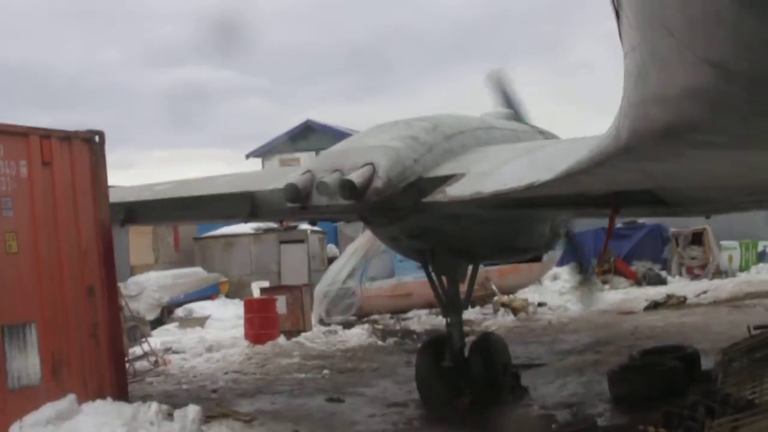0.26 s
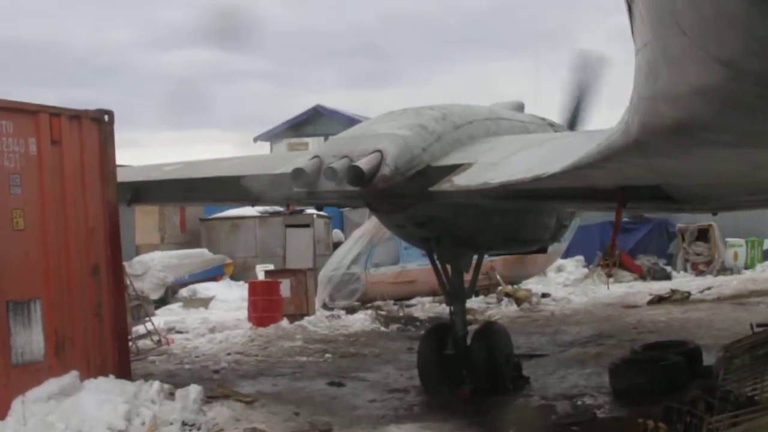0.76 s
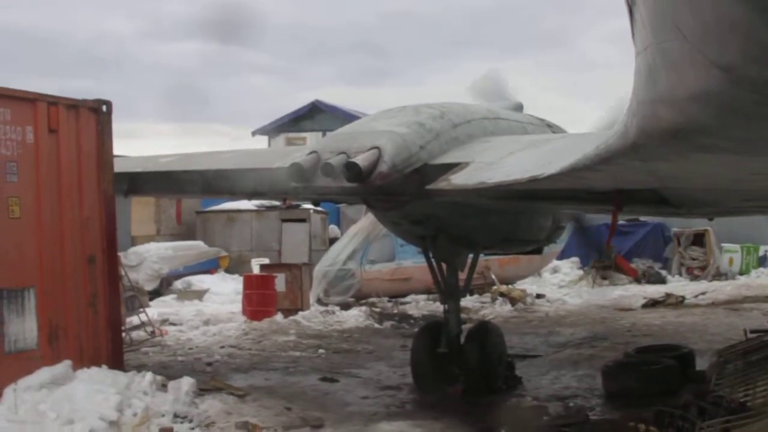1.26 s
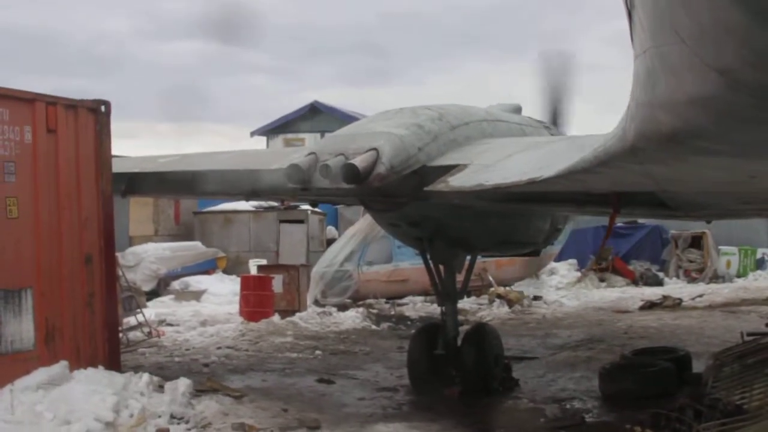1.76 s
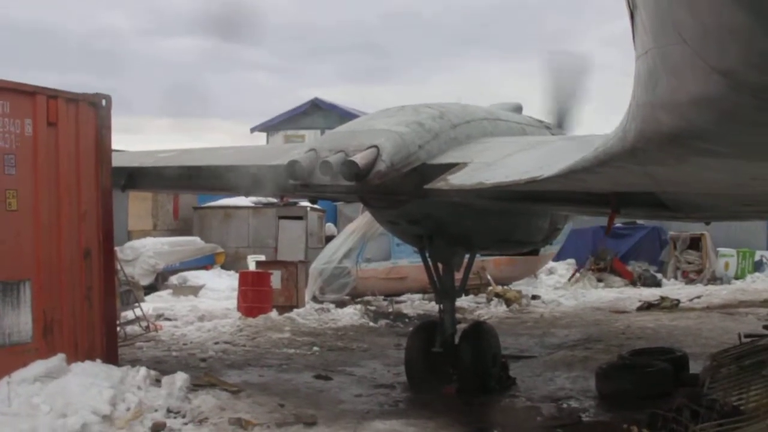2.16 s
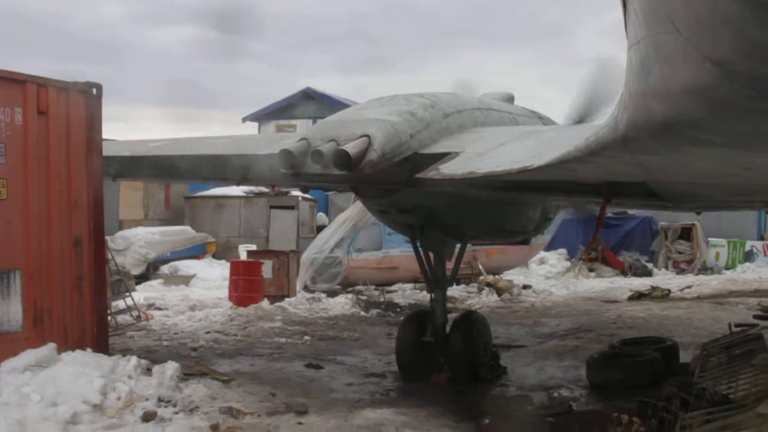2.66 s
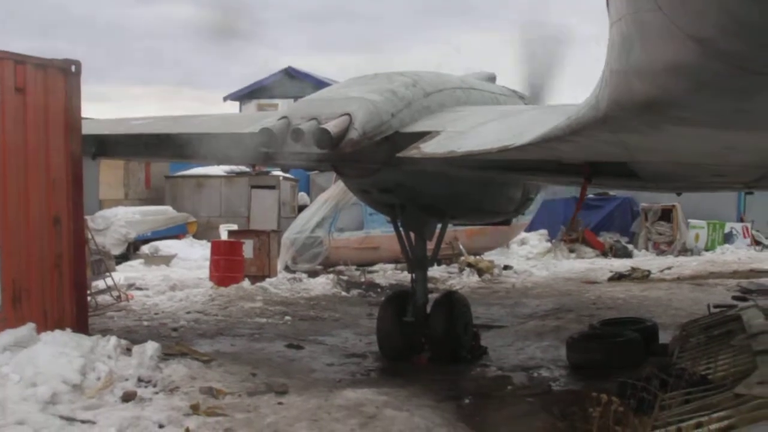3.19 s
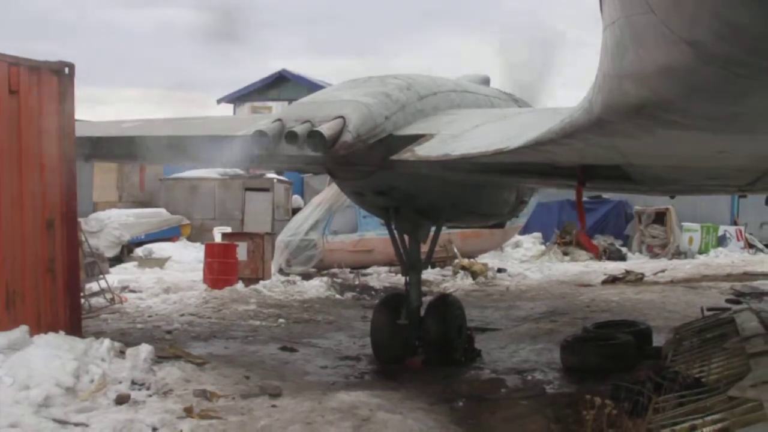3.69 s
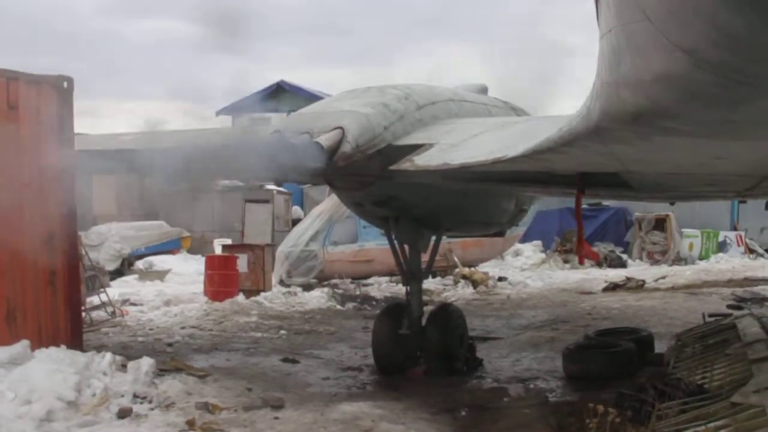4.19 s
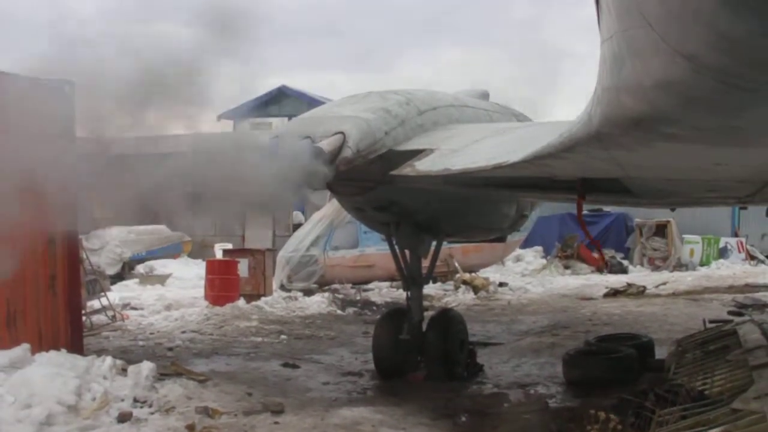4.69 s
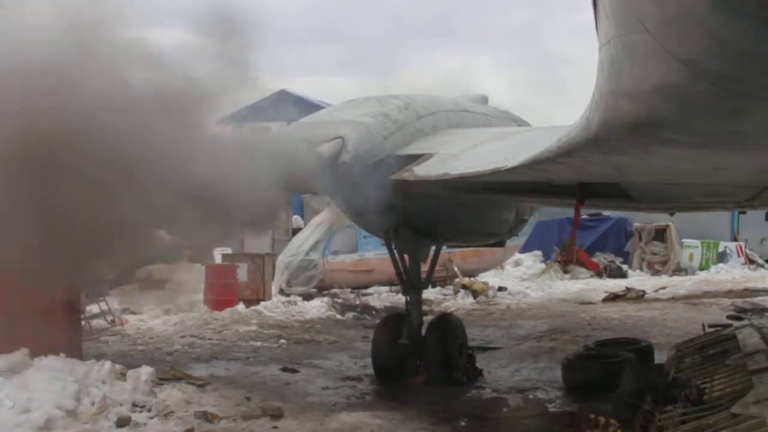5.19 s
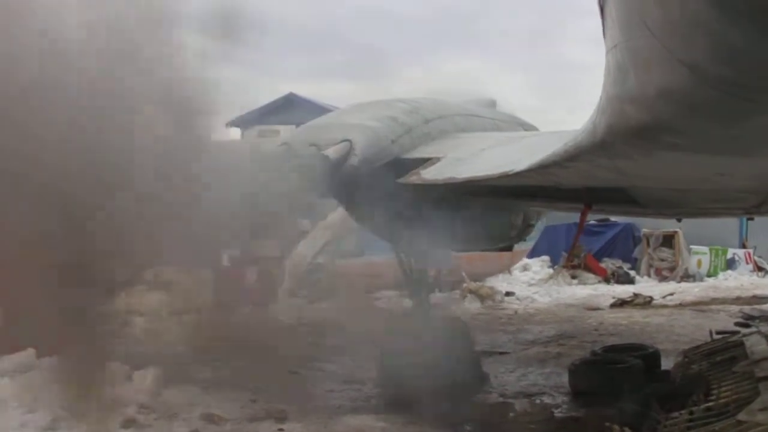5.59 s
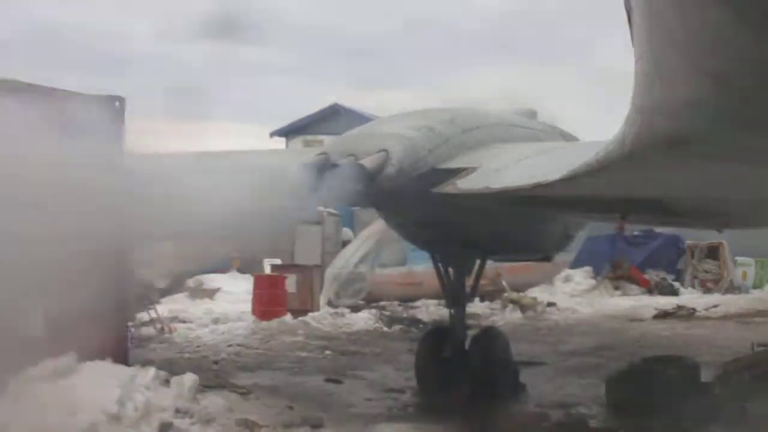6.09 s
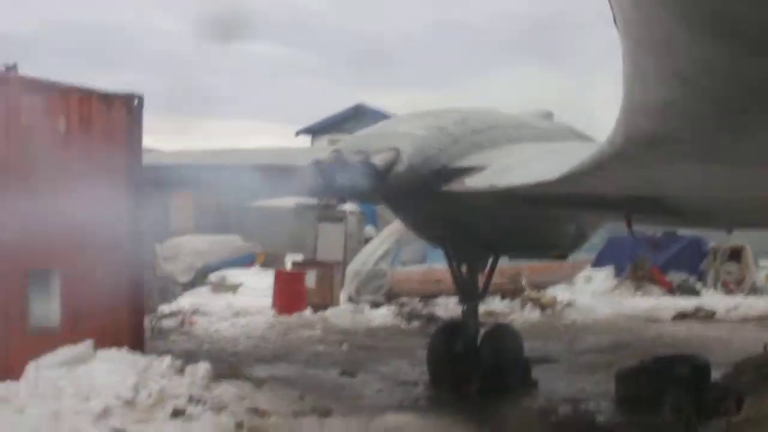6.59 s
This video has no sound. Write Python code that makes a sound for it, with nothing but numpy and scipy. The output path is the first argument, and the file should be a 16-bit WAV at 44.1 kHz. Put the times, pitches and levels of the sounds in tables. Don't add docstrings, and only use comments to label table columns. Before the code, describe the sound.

Close to a parked propeller aircraft in a yard, the starter cranks a large piston engine. Separate hollow exhaust coughs puff out over dull pumping, faint valve hiss and a thin gear whine. After about three seconds the cylinders catch in ragged rapid blasts, build into a rough droning roar with standout pops, and finally propeller wash thuds and crackles on the overloaded microphone.

```python
import sys
import numpy as np
from scipy import signal
from scipy.fft import rfft, irfft
from scipy.io import wavfile
from scipy.ndimage import uniform_filter1d

SR = 44100
rng = np.random.default_rng(int(sys.argv[2]) if len(sys.argv) > 2 else 0)


def to_wav(sig):
    pcm = np.clip(np.atleast_2d(sig), -1, 1) * 32767
    pcm = np.round(pcm).astype(np.int16)
    wavfile.write(sys.argv[1], SR, pcm.T)


def invert_db(x):
    u = np.asarray(x, float) / 20
    return 10 ** u


N = 302085

# t/s, churn level/dB, hiss level/dB
CHURN_LEVELS = [
    (0, -22, -32.5),
    (.05, -35, -37.5),
    (.16, -40, -46),
    (1.25, -48, -58),
    (1.75, -39.5, -54),
    (2.6, -43.5, -56),
    (3.4, -40, -51),
]
# f/Hz, density level/dB
CHURN_SPECTRUM = [(71, -8), (120, -15), (211, -14), (242, -6.5), (274, -25), (335, 3), (465, -6),
                  (720, -9.5), (767, -6.5), (817, -15.5), (926, -6.5), (2400, -17), (3120, -68),
                  (5280, -120)]
# f/Hz, density level/dB
HISS_SPECTRUM = [(940, -16), (1500, 4), (3300, 0.5), (4070, 0), (4320, -5), (6850, -11), (11600, -18.5),
                 (16000, -31)]
# t/s, f/Hz, level/dB
GEAR_WHINE = [
    (0, 3850, -55),
    (.3, 3950, -53),
    (.55, 3900, -50),
    (1.3, 3880, -61),
    (1.9, 3910, -58),
    (2.9, 3935, -63),
    (3.4, 3945, -66),
]
# t/s, level/dB
WASH_LEVELS = [(0, -27), (.06, -45), (.12, -50.5), (1.5, -53.5), (2.8, -50.5), (3.1, -46.5), (4.4, -37),
               (5.3, -34), (5.62, -31), (5.8, -24), (5.93, -18), (5.98, -37), (6.07, -22), (6.39, -26.5),
               (6.47, -21), (6.55, -29.5), (6.8, -21), (6.85, -34)]
# f/Hz, density level/dB
WASH_SPECTRUM = [(8, -35), (25, 1), (50, 0), (100, -2.5), (170, -4.5), (260, -5.5), (400, -30), (900, -59)]
# t/s, duration/s
HARD_GUSTS = [(5.747, .003), (5.762, .003), (5.792, .004), (5.85, .003), (5.864, .002), (5.884, .005),
              (5.894, .002), (5.905, .004), (6.0635, .008), (6.087, .002), (6.139, .003), (6.159, .003),
              (6.172, .004), (6.208, .008), (6.2155, .002), (6.251, .002), (6.27, .004), (6.293, .003),
              (6.408, .002)]
# f/Hz, density level/dB
JET_SPECTRUM = [(88, -19), (150, -25), (341, -6.5), (420, 1.5), (624, -12.5), (941, -11), (1340, 2.5),
                (1480, -5), (2310, -5), (11500, -25), (16000, -31)]
# f/Hz, bandwidth/Hz, level/dB
STACK_MODES = [(410, 120, -30.5), (727, 79, 2.5), (940, 34, 8), (1339, 18.7, -10.5), (1690, 20.5, -5.5),
               (2250, 78, -9)]
# t/s, jet level/dB, push level re jet/dB, whistle f/Hz, hoot f/Hz
COUGH_EVENTS = [(0.0544, -4.5, -1, 3960, 1340), (.3326, -7.5, -17, 2360, 540),
                (0.4179, -15.5, -17, 3220, 1300), (0.554, -5, 0, 2190, 1826), (.62, -6, 0, 2040, 1110),
                (.849, -7, -1, 3400, 1070), (0.9946, -7, -11, 1690, 1045), (1.1462, -8, 1, 4030, 933),
                (1.6544, -7, 0.5, 1660, 950), (1.995, -5, 3, 2800, 1396), (2.0812, -4.5, -1, 3130, 1143),
                (2.131, -13, -1, 2400, 1390), (2.383, -9.5, -9, 2330, 674), (2.9221, -5.5, 0, 2070, 997)]
# t/s, jet level/dB
SIGH_EVENTS = [(.1496, -35), (.2488, -52), (1.1122, -34), (1.575, -33), (1.5968, -36), (1.922, -31.5),
               (2.2982, -41), (2.8833, -35)]
# t/s, jet level/dB, fall time/s
CATCH_EVENTS = [(3.0774, -7.5, 0.028), (3.1205, -7.5, 0.0061), (3.1792, -11, 0.025), (3.211, -4, 0.0087),
                (3.276, -11, 0.015), (3.4, -5, 0.0071), (3.4367, -10.5, 0.016), (3.481, -6, 0.024),
                (3.5186, -8.5, 0.013), (3.5683, -6, 0.019), (3.6116, -7, 0.018), (3.6438, -7, 0.0096),
                (3.7185, -8, 0.012), (3.7616, -7.5, 0.016), (3.795, -12.5, 0.01), (3.8557, -4.5, 0.035),
                (3.898, -8, 0.028), (3.961, -5.5, 0.013), (3.988, -17, 0.0075), (4.02, -11, 0.013),
                (4.0392, -5, 0.0082), (4.0827, -4.5, 0.022), (4.1152, -5, 0.012)]
# t/s, jet level/dB, fall time/s
SURGE_EVENTS = [(4.2024, -4.5, 0.029), (4.25, -12, 0.0081), (4.3203, -2.5, 0.0072), (4.345, -11, 0.015),
                (4.3705, -5.5, .02), (4.405, -4, .015), (4.4308, -7, 0.0044), (4.4567, -3.5, 0.016),
                (4.5268, -10, 0.0082), (4.5527, -5, 0.01), (4.5865, -4, 0.022), (4.649, -6.5, 0.026),
                (4.6953, -6, 0.029), (4.7588, -5, 0.018), (4.8436, -6, 0.024), (4.885, -6, 0.019),
                (4.949, -6.5, 0.026), (4.9944, -10, 0.019), (5.0106, -4.5, 0.014), (5.0454, -5, 0.023),
                (5.0744, -9, 0.02), (5.146, -6.5, 0.0097), (5.168, -12, 0.017), (5.202, -6, 0.041),
                (5.254, -6.5, 0.014), (5.29, -10.5, 0.024), (5.3088, -5, 0.025)]
# t/s, jet level/dB
POP_EVENTS = [(5.34, -4.5), (5.37, -11), (5.396, -8), (5.4979, -7), (5.6507, -15), (5.7816, -9),
              (5.857, -26), (5.99, -15), (6.099, -11), (6.121, -4), (6.221, -11), (6.3184, -8),
              (6.3907, -7.5), (6.4358, -4.5), (6.541, -7), (6.6436, -9), (6.724, -10), (6.818, -30)]
# f/Hz, decay time T60/s
YARD_DECAY = [(200, 0.29), (1000, 0.36), (3000, 0.25), (8000, 0.12), (16000, 0.082)]
# f/Hz, bandwidth/Hz, level/dB
HULL_MODES = [(93.3, 11, -19), (181.7, 23, -23), (254, 9.9, -20.5), (335.6, 17, -18.5), (1130, 44, -21.5)]
# t/s, level/dB, start f/Hz, end f/Hz, duration/s
VALVE_SQUEAKS = [(0.084, -31, 4650, 4640, 0.018), (0.13, -45, 4280, 4170, 0.087),
                 (.135, -62, 13500, 13450, .07), (0.233, -67, 7350, 7300, 0.037),
                 (0.23, -70, 13700, 13600, .04), (0.407, -33.5, 2980, 3540, 0.049),
                 (1.095, -66, 13500, 13500, .03), (1.75, -68, 13500, 13500, .05),
                 (2.306, -52, 4200, 4200, 0.054), (2.87, -64, 13600, 13600, .04),
                 (3.636, -27.5, 3220, 3400, 0.042)]
# t/s, level/dB
DRONE_LEVELS = [
    (3.2, -70),
    (3.3, -37),
    (3.6, -58),
    (4.29, -39),
    (4.52, -34.5),
    (4.94, -24.5),
    (5.2, -23),
    (5.62, -19.5),
    (6.5, -22),
    (6.85, -24),
]
# f/Hz, bandwidth/Hz, level/dB
DRONE_MODES = [(354, 91, 0), (422, 52, -3.5), (491, 26, -6.5)]
# f/Hz, density level/dB
ROAR_SPECTRUM = [(350, -36), (600, -12), (944, 4), (1040, -7.5), (1310, 1.5), (1780, -1), (2240, 3),
                 (6640, -13.5), (13000, -34), (16000, -41)]


def evened(x):
    return x / np.sqrt(np.mean(x ** 2) + 1e-20)


def read(points, hz):
    f, value = np.transpose(points)
    return np.interp(np.log(hz + 1), np.log(f + 1), value)


def curves(rows):
    s, *columns = np.transpose(rows)
    return [np.interp(np.arange(N) / SR, s, column) for column in columns]


def add(mix, s, sound):
    part = mix[max(round(s * SR), 0):][:len(sound)]
    part += sound[:len(part)]


def noise(length=N):
    return rng.standard_normal(length)


def resonate(x, hz, width):
    return signal.lfilter(*signal.iirpeak(hz, hz / width, SR), x)


def coloured(x, points):
    hz = abs(np.fft.fftfreq(8192, 1 / SR))
    log_gain = np.log(invert_db(np.maximum(read(points, hz), -100)))
    taps = np.fft.ifft(np.exp(np.conj(signal.hilbert(log_gain)))).real[:4096]
    return signal.oaconvolve(x, taps / np.linalg.norm(taps))[:len(x)]


def slow(rate):
    hz = np.fft.rfftfreq(N, 1 / SR)
    return evened(irfft(rfft(noise()) / (1 + (hz / rate) ** 2), N))


def trail(x, s):
    r = np.exp(-1 / (s * SR))
    return np.sqrt(signal.lfilter([1 - r], [1, -r], x ** 2) + 1e-12)


def wind_cut(x):
    return signal.lfilter(*signal.butter(1, 170, "high", fs=SR), x)


def churn(blasts):
    churn_db, hiss_db = curves(CHURN_LEVELS)
    lingering = invert_db(-37) * trail(blasts, 0.026)
    dull = np.hypot(invert_db(churn_db), lingering) * invert_db(4.5 * slow(4.9))
    dull = dull * coloured(noise(), CHURN_SPECTRUM)
    hiss = invert_db(hiss_db + 1.2 * slow(14)) * coloured(noise(), HISS_SPECTRUM)
    whine_hz, whine_db = curves(GEAR_WHINE)
    whine = invert_db(whine_db + 1.6 * slow(25)) * np.sin(2 * np.pi * np.cumsum(whine_hz) / SR)
    faint_hiss = invert_db(-66.0) * coloured(noise(), [(2500, -28), (5000, 9), (10000, -16), (16000, -8)])
    return dull + hiss + whine + faint_hiss


def wash(blasts):
    wind = coloured(noise(), WASH_SPECTRUM)
    wind /= np.std(wind_cut(wind))
    buffeting = invert_db(-27.5) * trail(blasts, 0.0095)
    lumps = invert_db(1.3 * slow(16.0) + 1.65 * slow(13))
    wind *= np.hypot(invert_db(curves(WASH_LEVELS)[0]), buffeting) * lumps
    t = np.arange(N) / SR
    for k, (s, length) in enumerate(HARD_GUSTS):
        wind += 0.85 * (-1) ** k * np.exp(-((t - s) / (0.43 * length)) ** 2)
    return wind


def schedule():
    whistle_hz, hoot_hz = 2400, 1104
    coughs = [(*row, 0.017, 0.018) for row in COUGH_EVENTS]
    sighs = [(s, db, -37, whistle_hz, hoot_hz, 0.011, 0.039) for s, db in SIGH_EVENTS]
    run_from_s, run_per_s, run_fall_s = 5.36, 31, 0.02
    beats = np.arange(run_from_s, N / SR, 1 / run_per_s)
    late, size = rng.standard_normal((len(beats), 2)).T
    beats = beats + 0.15 * late / run_per_s
    steady = [(s, db, run_fall_s) for s, db in zip(beats, -13 + 4 * size)]
    pops = [(s, db, run_fall_s) for s, db in POP_EVENTS]
    lit = list(CATCH_EVENTS) + list(SURGE_EVENTS) + pops + steady
    luck = np.clip(rng.standard_normal((len(lit), 4)), -2, 2)
    fired = [(s, db, -a, whistle_hz * np.exp(0.181 * b), hoot_hz * np.exp(0.297 * d),
              0.016 * np.exp(0.26 * c), fall)
             for (s, db, fall), (a, b, c, d) in zip(lit, luck)]
    return coughs + sighs + fired


def exhaust_gas(length):
    gas = coloured(noise(length), JET_SPECTRUM)
    treble = signal.sosfiltfilt(signal.butter(2, 8500, "high", fs=SR, output="sos"), gas[:N])
    smoke = (1 + np.tanh((np.arange(N) / SR - 3.85) / 0.17)) / 2
    gas[:N] += (invert_db(-0.5 - 10 * smoke) - 1) * treble
    gas[:N] *= invert_db(0.64 * slow(410))
    return gas


def firings():
    t = np.arange(SR // 4) / SR
    gas = exhaust_gas(N + len(t))
    body = signal.sosfiltfilt(signal.butter(2, 3500, fs=SR, output="sos"), gas)
    pulse = np.sin(2 * np.pi * 330 * t) * t / 0.0071 * np.exp(-t / 0.0057)
    rows = schedule()
    luck = rng.standard_normal((len(rows), len(STACK_MODES) + 5))
    out = np.zeros(N)
    for (s, jet_db, push_db, whistle_hz, hoot_hz, rise, fall), chance in zip(rows, luck):
        opening = (1 - np.exp(-(t / 0.0046) ** 2.25)) * (0.16 + 0.58 * np.minimum(t / rise, 1))
        speed = opening * np.exp(-(np.maximum(t - rise, 0) / fall) ** 2.0)
        at = max(round((s - 0.0095) * SR), 0)
        low = body[at:at + len(t)]
        fine = gas[at:at + len(t)] - low
        jet = speed * low + invert_db(9.0 + 0.3 * jet_db) * speed ** 1.173 * fine
        push = invert_db(push_db) * pulse
        drive = jet + invert_db(-2.0) * push
        rings = np.zeros(len(t))
        for (hz, width, db), c in zip(STACK_MODES, chance):
            detuned_hz = hz * (1 + 0.032 * np.tanh(c * chance[-1]))
            rings += invert_db(db + 3 * c) * resonate(drive, detuned_hz, width)
        upper = sum(resonate(jet, 2700 * np.exp(0.5 * np.tanh(0.69 * c)), 50.7) for c in chance[-5:])
        whistle = evened(resonate(noise(len(t)), whistle_hz, 130)) * speed
        hoot = evened(resonate(noise(len(t)), hoot_hz, 120)) * speed
        whistle += invert_db(3.0) * resonate(hoot, hoot_hz, 45)
        boom = invert_db(-3.0) * resonate(speed, 91, 8.3) + invert_db(19.0) * resonate(speed, 170, 60)
        blast = invert_db(-11.0) * jet + invert_db(-6.5) * rings + invert_db(-11.0) * upper
        blast += invert_db(-6.0) * push + invert_db(-17.0) * whistle + invert_db(-10.0) * boom
        add(out, at / SR, invert_db(jet_db) * blast)
    return out


def hull(blasts):
    shake = noise() * np.minimum(trail(blasts, 0.027), invert_db(-20.0))
    return sum(invert_db(db) * np.sqrt(SR / width) / 2 * resonate(shake, hz, width)
               for hz, width, db in HULL_MODES)


def yard(x):
    taps = np.zeros(SR)
    at = np.arange(300, SR - 20, 20)
    taps[at + rng.integers(0, 20, len(at))] = rng.choice([-1., 1.], len(at))
    hz, t, z = signal.stft(taps, SR, nperseg=256)
    decay = invert_db(-60 * t / read(YARD_DECAY, hz)[:, None])
    tail = signal.istft(z * decay, SR, nperseg=256)[1]
    return signal.fftconvolve(x, tail / np.linalg.norm(tail))[:N]


def squeaks():
    out = np.zeros(N)
    for s, db, start_hz, end_hz, length in VALVE_SQUEAKS:
        u = np.linspace(0, 1, round(length * SR))
        fuzz = 1 + 2.1 * evened(uniform_filter1d(noise(SR // 5), 90))[:len(u)]
        glide_hz = end_hz + (start_hz - end_hz) * np.exp(-3 * u)
        tone = np.sin(2 * np.pi * np.cumsum(glide_hz) / SR)
        add(out, s, invert_db(db) * fuzz * tone * np.sin(np.pi * u ** 0.5))
    return out


def roar():
    drone_db, = curves(DRONE_LEVELS)
    roar_db = -20 + 1.96 * np.minimum(drone_db + 20, 0)
    jets = coloured(noise(), ROAR_SPECTRUM) * invert_db(roar_db + 1.5 * slow(48.0) + 3.7 * slow(280))
    source = noise()
    drone = evened(sum(invert_db(db) * resonate(resonate(source, hz, width), hz, 4.5 * width)
                       for hz, width, db in DRONE_MODES))
    return jets + invert_db(drone_db + 2.8 * slow(18)) * drone


def scene():
    blasts = firings()
    near = blasts + squeaks()
    mix = near + invert_db(-9.5) * yard(near) + roar() + churn(blasts) + wash(blasts) + hull(blasts)
    return mix[None]


def overload(x, ceiling):
    return x / (1 + abs(x / ceiling) ** 12) ** (1 / 12)


def low_pass(x):
    return signal.sosfilt(signal.butter(12, 16190, fs=SR, output="sos"), x)


def record(dry):
    r = np.exp(-1 / (0.15 * SR))
    power = signal.lfilter([1 - r], [1, -r], wind_cut(dry[0]) ** 2)
    power_db = 10 * np.log10(power + 1e-9)
    ceiling = invert_db(np.clip(-11.5 - 1.4 * (power_db + 21), -11.5, -2))
    x = overload(wind_cut(overload(dry, ceiling)), 1.06 * ceiling)
    x = signal.sosfilt(signal.butter(2, 52, "high", fs=SR, output="sos"), x)
    band_limit = signal.firwin(1023, 15900, window=("kaiser", 9), fs=SR)
    x = signal.oaconvolve(x, band_limit[None], "same")
    return low_pass(x)


dry = scene()
out = record(dry)
to_wav(out)
```